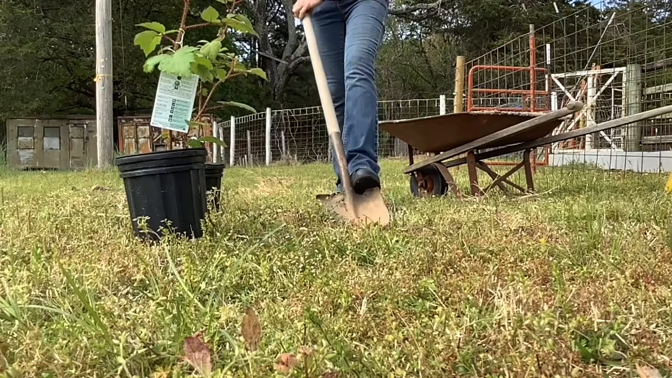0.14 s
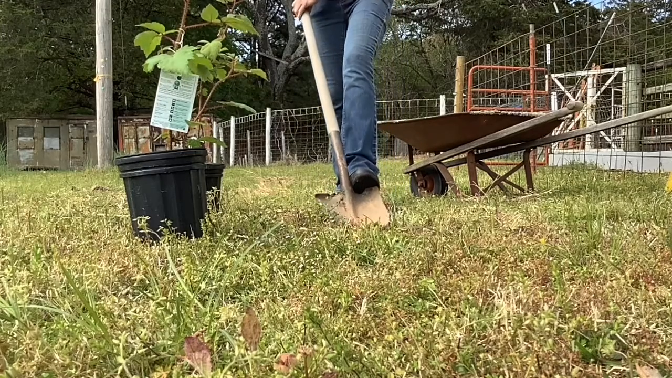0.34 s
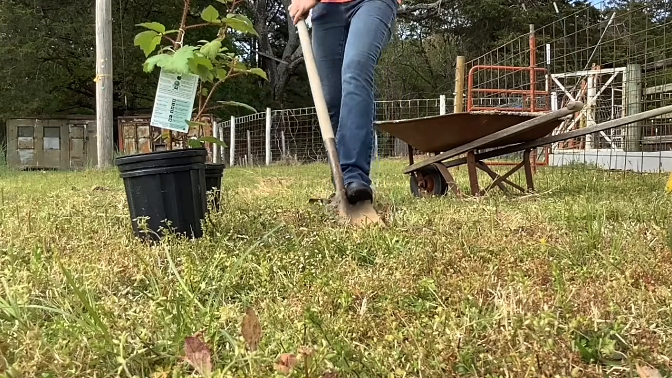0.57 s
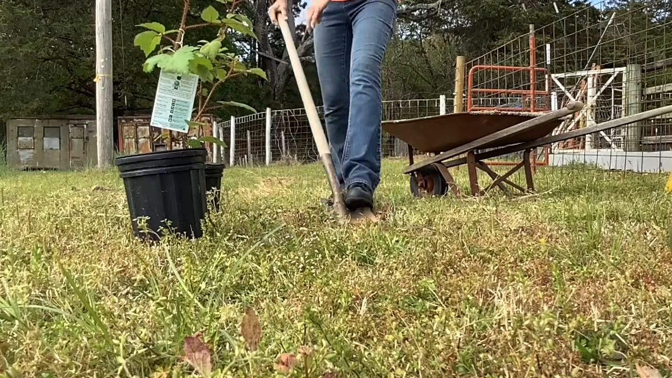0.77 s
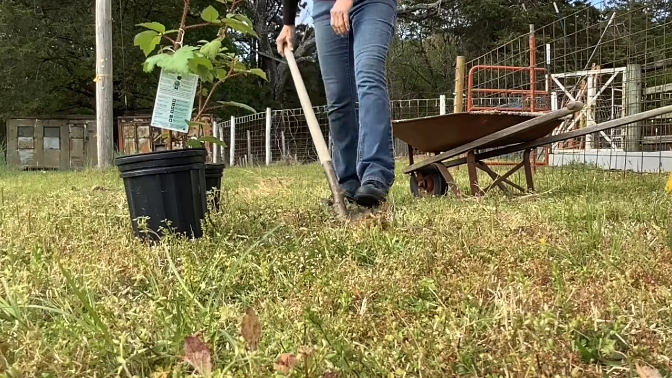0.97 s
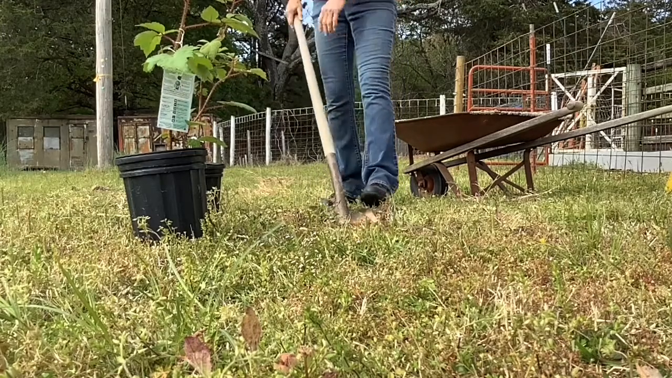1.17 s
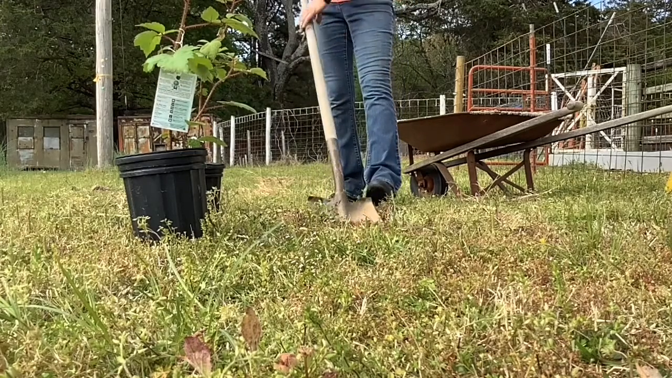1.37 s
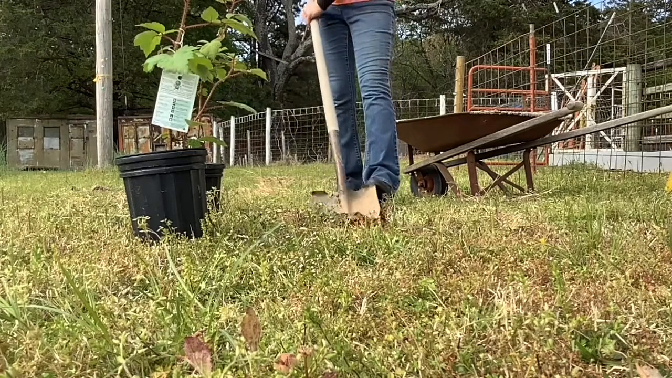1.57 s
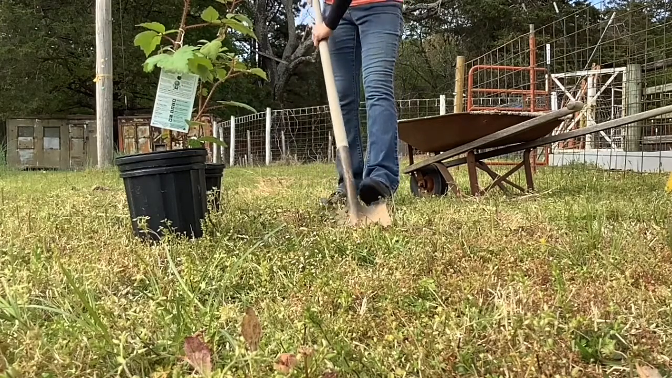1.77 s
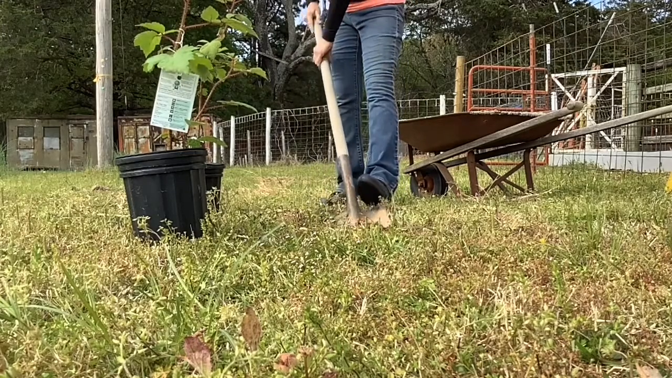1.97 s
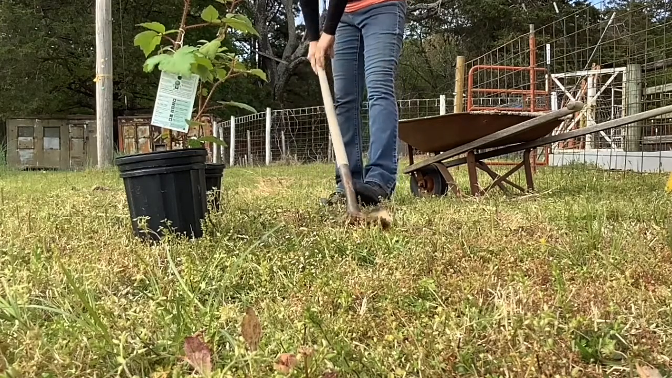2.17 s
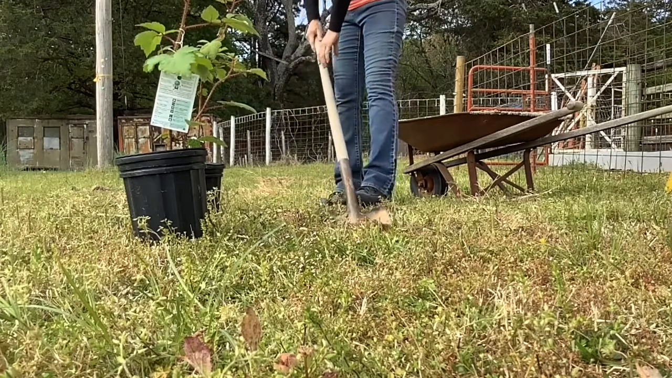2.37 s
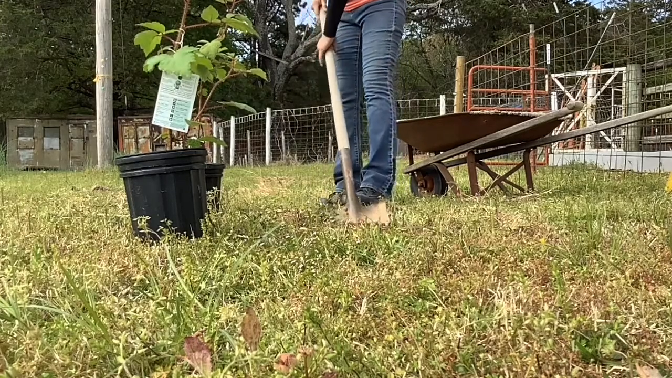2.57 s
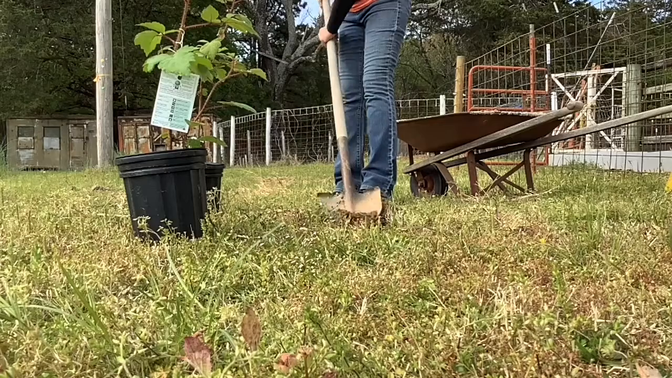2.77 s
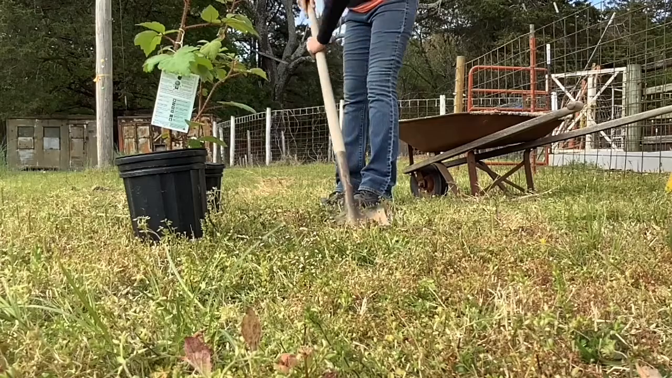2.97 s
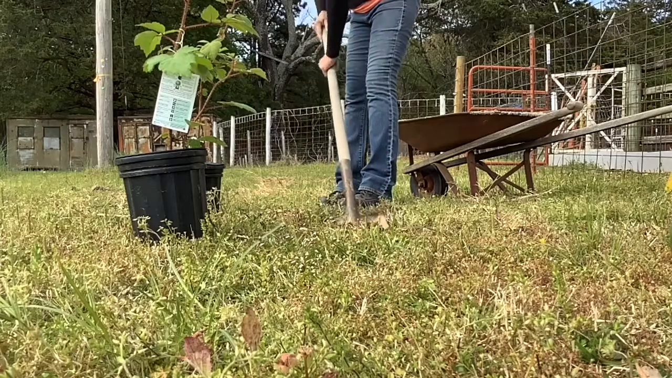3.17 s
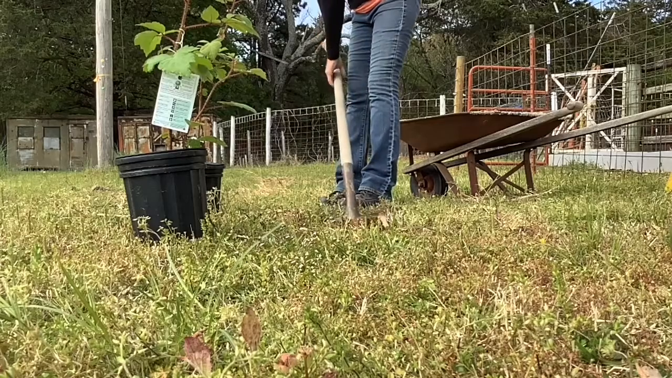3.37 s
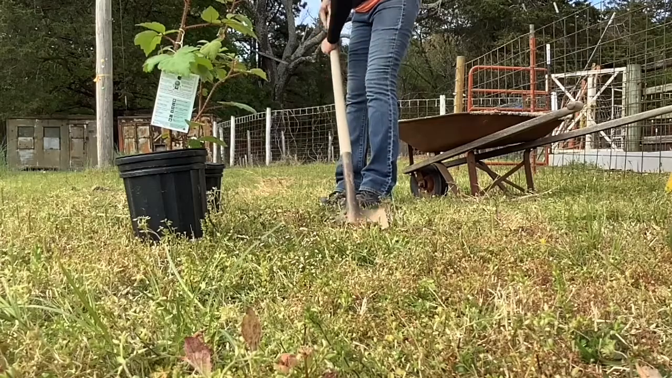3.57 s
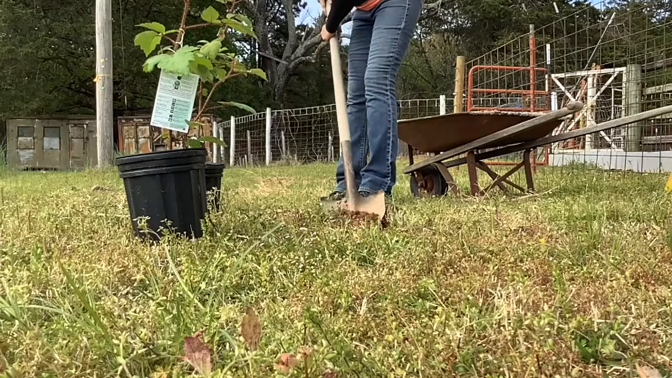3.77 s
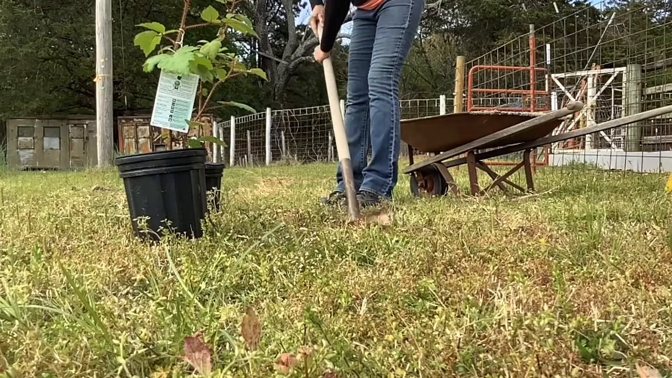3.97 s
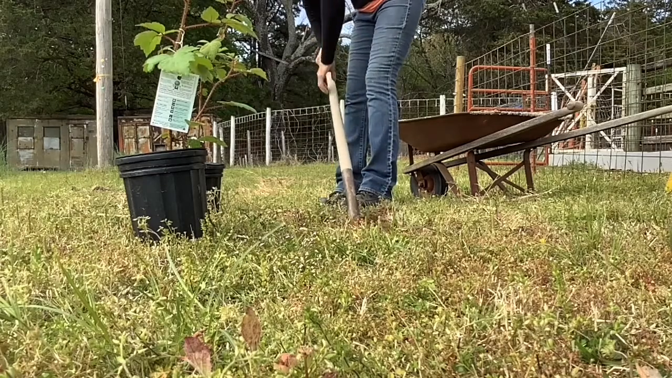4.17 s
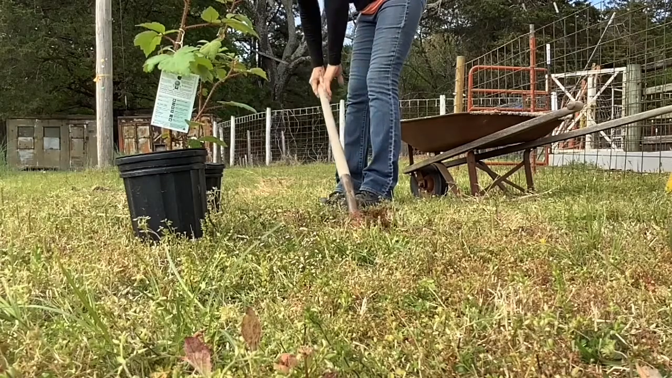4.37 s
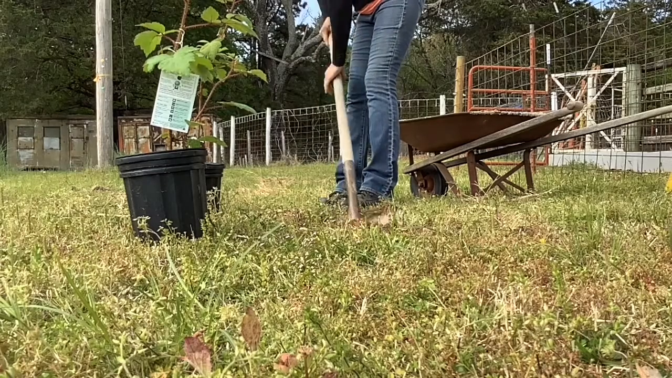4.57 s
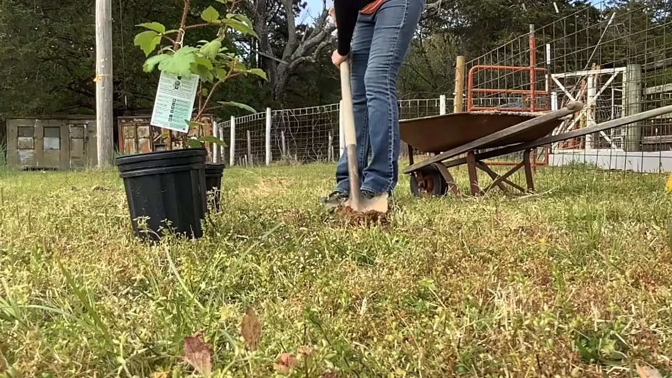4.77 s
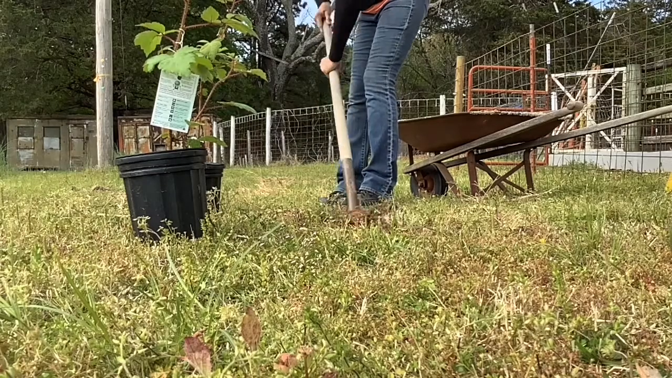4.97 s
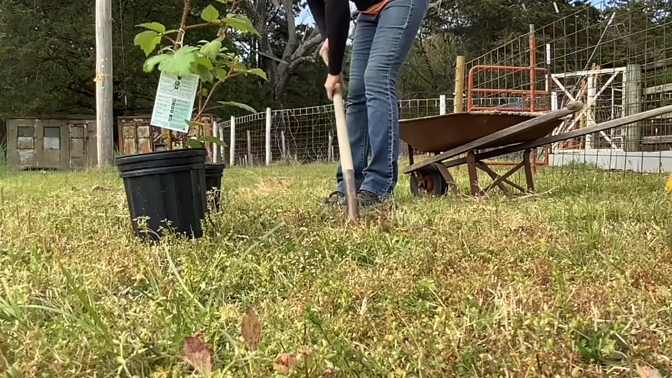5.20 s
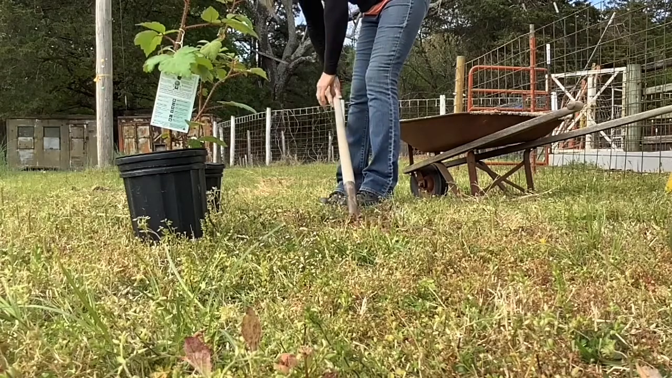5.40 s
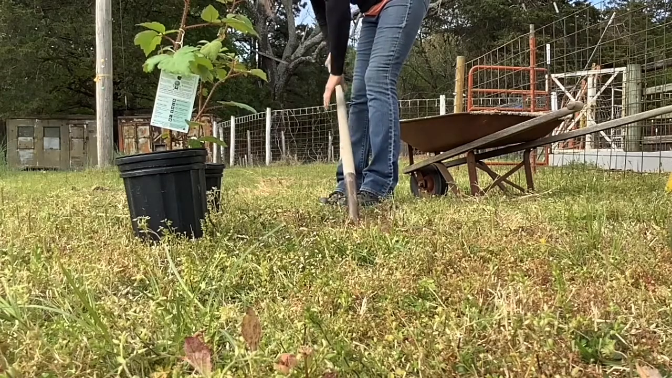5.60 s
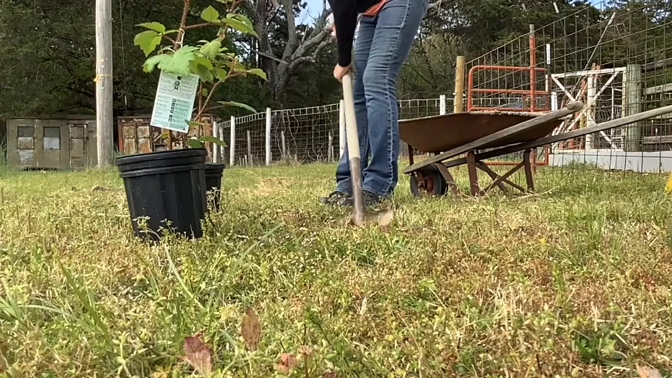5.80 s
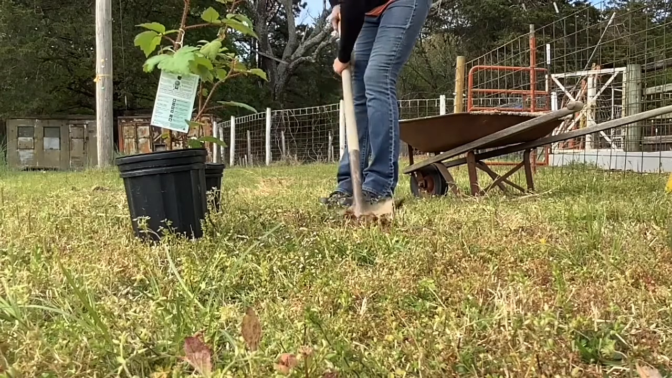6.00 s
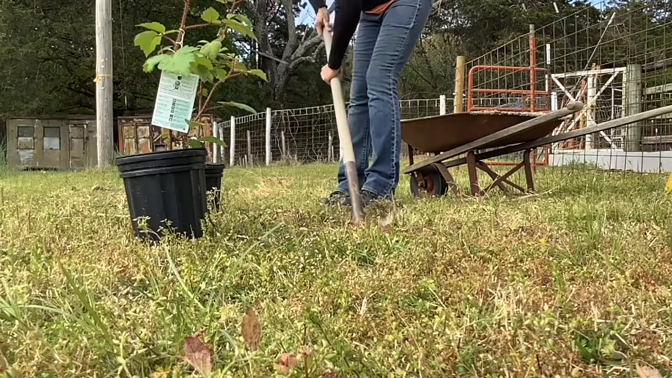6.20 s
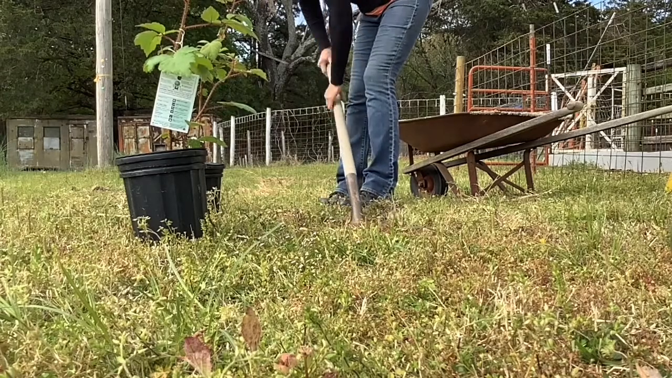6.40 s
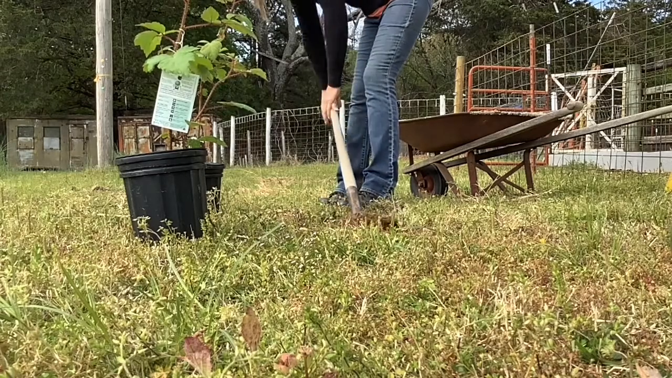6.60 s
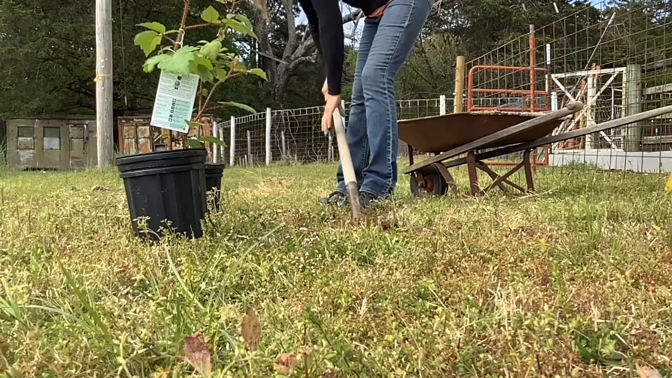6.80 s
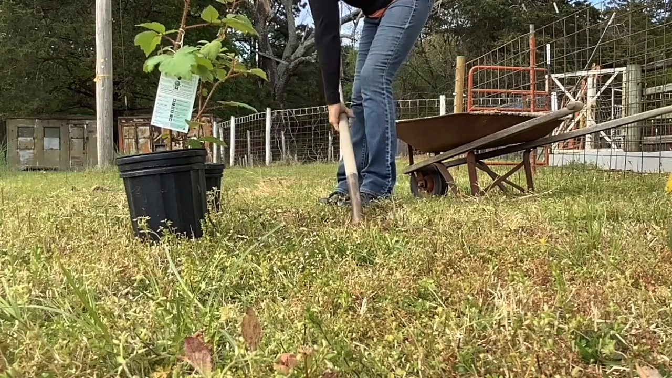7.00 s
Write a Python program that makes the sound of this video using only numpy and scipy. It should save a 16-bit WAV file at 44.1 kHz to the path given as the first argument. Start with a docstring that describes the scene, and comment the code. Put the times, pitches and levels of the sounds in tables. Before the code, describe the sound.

Short hollow chops of a shovel blade into packed soil, with dry crunches and soft levering between them, over faint distant motor drone outdoors.

```python
"""Shovel in hard clay, quiet garden

A steel shovel blade is stabbed into hard clay about once a second, then levered, near a low microphone.
Random crumb and sand clicks ring the blade modes, jolts are swelling tones, late thuds come by the ground.
Behind it: filtered-noise air, far traffic rumble and insects, wavering motor tones, one faint blurred bird."""
import sys
import numpy as np
from scipy import signal
from scipy.fft import rfft, irfft, next_fast_len
from scipy.io import wavfile

SR = 44100
rng = np.random.default_rng(int(sys.argv[2]) if len(sys.argv) > 2 else 0)


def wav_out(sig):
    """Save sig, one row per channel (or a flat mono array), as 16-bit PCM at SR to the path in sys.argv[1]."""
    wavfile.write(sys.argv[1], SR, np.round(np.clip(np.atleast_2d(sig).T, -1, 1) * 32767).astype(np.int16))


def invert_db(level):
    """Linear amplitude ratio for a level in decibels (20 dB per decade), elementwise."""
    return 10 ** (np.asarray(level, dtype=float) / 20)


N = 310905   # samples, 7.05 s

# middle modes of the blade: pitch_hz, width_hz, level_db
RING_MODES = [(952, 170, -0.5), (1097, 230, 1.5), (1298, 200, 3), (1594, 95, 1.5), (1792, 81, 2.5),
              (2214, 53, -12.5), (2547, 170, -13.5)]
# modes near the cutting edge: pitch_hz, width_hz, level_db
EDGE_MODES = [(2340, 530, -6.5), (3130, 230, -9.5), (3500, 210, -9.5), (3795, 80, -12.5), (4160, 80, -5.5),
              (4500, 200, -7), (4920, 250, -9), (5357, 240, -7.5), (6100, 1500, -10.5), (6550, 150, -12.5),
              (7200, 200, -17.5)]


def rms_one(x):
    """Scale to rms 1."""
    return x / np.sqrt(np.mean(x ** 2) + 1e-20)


def in_time(rows):
    """Columns of a table as straight lines in time, one value per sample."""
    s, *columns = np.transpose(rows)
    return [np.interp(np.arange(N) / SR, s, column) for column in columns]


def drift(rate_hz):
    """Slow random wander: normal random points of spread 1, joined by straight lines."""
    points = rng.standard_normal(int(N / SR * rate_hz) + 2)
    return np.interp(np.arange(N) / SR * rate_hz, np.arange(len(points)), points)


def coloured(x, spectrum):
    """Give a steady signal a spectrum of (pitch_hz, level_db), then rms 1."""
    size = next_fast_len(N)
    hz, db = np.transpose(spectrum)
    bin_hz = np.arange(size // 2 + 1) * SR / size
    shape_db = np.interp(np.log(bin_hz + 1), np.log(hz), db)
    return rms_one(irfft(rfft(x, size) * invert_db(shape_db), size)[:N])


def resonate(x, hz, width_hz):
    """One damped resonance, gain 1 on top."""
    r = np.exp(-np.pi * width_hz / SR)
    feedback = [1, -2 * r * np.cos(2 * np.pi * hz / SR), r * r]
    return signal.lfilter([(1 - r * r) / 2, 0, (r * r - 1) / 2], feedback, x + 1e-18)


def modes(x, table):
    """Parallel resonances with alternating signs."""
    return sum((-1) ** k * invert_db(db) * resonate(x, hz, width) for k, (hz, width, db) in enumerate(table))


def below(x, hz):
    """Steep low-pass: removes everything above hz."""
    return signal.sosfilt(signal.butter(4, hz, fs=SR, output="sos"), x)


def tone(hz, db, waver_db):
    """A far motor tone that wavers in level and pitch on its way through the air."""
    phase = 2 * np.pi * np.cumsum(hz + 0.6 * drift(12)) / SR
    return np.sqrt(2) * invert_db(db + waver_db * drift(11)) * np.sin(phase)


def air():
    """Steady air of the garden: noise with a fixed spectrum."""
    # colour of the air: pitch_hz, level_db (density per Hz)
    air_spectrum = [(21, -36), (35, -11.5), (65, 1), (92, 2), (162, -20), (284, -13.5), (510, -12),
                    (610, -28), (729, -25.5), (941, -36.5), (3280, -45.5), (4350, -37), (5200, -47),
                    (8440, -39.5), (15600, -49.5)]
    return invert_db(-65.5) * coloured(rng.standard_normal(N), air_spectrum)


def rumble():
    """Far traffic: low band noise that swells and sinks."""
    # level of the traffic: time_s, level_db
    swells = [(0.0, -63.5), (0.53, -58), (0.78, -61), (1.18, -71), (1.51, -61.5), (1.75, -50.5),
              (2.08, -68), (2.32, -62.5), (2.61, -62), (2.87, -62), (3.36, -63), (4.18, -61.5), (4.53, -62),
              (4.85, -61.5), (5.2, -63.5), (5.38, -61), (6.87, -63), (7.05, -60)]
    low = signal.butter(2, [55, 170], "band", fs=SR, output="sos")
    noise = rms_one(signal.sosfilt(low, rng.standard_normal(N)))
    return invert_db(in_time(swells)[0] + 3.1 * drift(2.6)) * noise


def motors():
    """Far motor hum with its octave, and three fainter steady-pitched tones."""
    # far hum: time_s, pitch_hz, level_db, octave_level_db
    hum = [(0, 89.76, -78.5, -81.5), (2.4, 91.08, -66.5, -79.5), (3.0, 90.5, -61.5, -76),
           (3.5, 91.4, -62, -76), (3.8, 91.97, -73, -78), (4.2, 90.26, -62, -77),
           (4.6, 90.27, -55.5, -67.5), (5.05, 90.86, -64, -70), (5.3, 90.82, -51.5, -68.5),
           (6.0, 92, -55.5, -71), (6.6, 92.6, -52, -70.5), (7.05, 93.2, -52.5, -73)]
    # fainter tones: pitch_hz of each
    drone_pitches = [144.8, 102.0, 57.7]
    # their levels: time_s, first_level_db, second_level_db, third_level_db
    drone_levels = [(0, -66.5, -80, -80), (1.0, -72.5, -78, -79), (2.25, -80.5, -80, -81),
                    (2.5, -63, -76, -85.5), (2.85, -59.5, -74, -76.5), (3.17, -78.5, -59.5, -78.5),
                    (3.9, -72, -70.5, -78.5), (4.5, -77, -69.5, -69), (5.0, -70, -70.5, -68.5),
                    (6.0, -61, -66, -75.5), (7.05, -64.5, -65.5, -59.5)]
    hz, db, octave_db = in_time(hum)
    drones = sum(tone(drone_hz, drone_db, 2.9)
                 for drone_hz, drone_db in zip(drone_pitches, in_time(drone_levels)))
    return tone(hz, db, 1.1) + tone(2 * hz, octave_db, 0.75) + drones


def insects():
    """Insect chorus: noise through the same resonance twice, its level wandering."""
    hz, width_hz, level_db = 4400, 410, -91.5
    chorus = resonate(resonate(rng.standard_normal(N), hz, width_hz), hz, width_hz)
    return invert_db(level_db + 1.5 * drift(4)) * rms_one(chorus)


def bird():
    """Leaves and distance smear the far bird's notes into a band of flutter around the pitch."""
    # notes blurred by trees: time_s, pitch_hz, level_db
    notes = [(4.27, 4000, -105), (4.3, 3900, -84), (4.35, 3700, -78.5), (4.38, 3900, -90),
             (4.45, 4050, -79), (4.47, 3900, -85), (4.52, 4000, -72), (4.56, 4100, -86),
             (4.62, 4250, -78.5), (4.72, 4300, -100)]
    hz, db = in_time(notes)
    slow = signal.butter(2, 220, fs=SR, output="sos")
    blur = rms_one(signal.sosfilt(slow, rng.standard_normal((2, N))))
    phase = 2 * np.pi * np.cumsum(hz) / SR
    return invert_db(db) * (blur[0] * np.sin(phase) + blur[1] * np.cos(phase))


def thuds():
    """The ground carries low tones slowly: the lower, the later they arrive."""
    # thuds before the ground delay: time_s, level_db
    blows = [(0.55, -45.5), (0.669, -62), (1.768, -38), (1.891, -41), (2.94, -39), (3.88, -33),
             (4.971, -40), (6.125, -38.5)]
    # tones of the ground: pitch_hz, level_db, t60_s
    ground_modes = [(62.9, -6, 0.1), (125, 2, 0.077), (220, -3, 0.082), (310, 6.5, 0.03)]
    out, t = np.zeros(N + 12000), np.arange(12000) / SR
    for s, db in blows:
        for hz, mode_db, t60 in ground_modes:
            at = round((s + 3.3 / hz) * SR)   # 3.3 cycles late
            swell = (1 - np.exp(-t * hz / 0.15)) * invert_db(-60 * t / t60)
            out[at:at + 12000] += invert_db(db + mode_db) * swell * np.sin(2 * np.pi * hz * t)
    return out[:N]


def jolts():
    """Each jolt swells over a few cycles in the blade body and dies in the clay; its front strikes upper modes."""
    # the clay stops or slips under the blade: peak_s, body_db, body_pitch_hz, length_ms, upper_ring_db
    jolt_rows = [(0.42, -45, 570, 9.2, -74), (0.443, -43, 577, 6.6, -53), (0.455, -44.5, 580, 6.9, -66),
                 (0.479, -46, 598, 4, -50), (0.501, -35, 624, 9.2, -61), (0.517, -33, 543, 2, -49),
                 (0.552, -25, 557, 4.1, -48), (0.573, -34.5, 637, 5.6, -58), (0.639, -43.5, 610, 8, -61),
                 (0.666, -39.5, 550, 6.3, -62), (0.685, -38.5, 516, 4.1, -53), (0.717, -48, 524, 6.8, -59),
                 (0.741, -44, 529, 6.7, -49.5), (1.397, -53.5, 613, 9.2, -63), (1.72, -34.5, 568, 6, -60),
                 (1.756, -18.5, 550, 12.3, -36.5), (1.762, -9.5, 539, 8.8, -23.5),
                 (1.771, -14, 471, 3.55, -41.5), (1.779, -33.5, 568, 4.2, -49),
                 (1.89, -30.5, 495, 4.2, -55), (2.121, -49.5, 483, 6.5, -63), (2.912, -36, 539, 6.8, -39.5),
                 (2.923, -30, 544, 10.8, -51.5), (2.933, -14.5, 544, 9.8, -21),
                 (2.944, -11, 502, 3.5, -33.5), (2.958, -25.5, 554, 2.4, -64), (3.033, -40, 588, 8.6, -78),
                 (3.078, -43, 510, 2.9, -60), (3.825, -40, 612, 3.77, -30), (3.855, -46, 457, 1.75, -35.5),
                 (3.864, -19, 460, 2.75, -26), (3.877, -21.5, 570, 4.1, -46.5),
                 (3.886, -19.5, 460, 3.33, -47), (3.893, -35, 450, 2.6, -56.5),
                 (3.955, -42.5, 490, 2.8, -69), (4.135, -44, 567, 8.25, -68.5), (4.149, -41.5, 496, 4, -51),
                 (4.221, -51, 504, 3.5, -66), (4.94, -33.5, 524, 5.1, -32.5), (4.95, -27, 460, 3.1, -59.5),
                 (4.961, -26.5, 377, 4.63, -36.5), (4.975, -26, 514, 2.9, -36),
                 (4.986, -25.5, 601, 8.3, -43), (5.085, -48, 499, 3.1, -70), (5.162, -48.5, 496, 4.1, -75),
                 (5.177, -43.5, 447, 3.5, -78), (5.21, -45, 459, 3.7, -59), (5.24, -47, 467, 5, -74.5),
                 (5.753, -41, 544.4, 4.2, -55), (5.773, -40, 500, 5, -55), (5.908, -51, 516, 3.8, -59),
                 (6.066, -37.5, 474, 3.4, -47), (6.092, -36, 437, 5, -44), (6.122, -20, 499, 2.94, -53),
                 (6.138, -30, 577, 6.1, -42.5), (6.189, -47.5, 601, 10.8, -64),
                 (6.219, -48.5, 536, 7.1, -61), (6.282, -44.5, 543, 3.4, -55.5)]
    out, fronts, t = np.zeros(N + 4000), np.zeros(N), np.arange(4000) / SR
    for s, db, hz, length_ms, ring_db in jolt_rows:
        rise_s = length_ms / 1700   # the swell is 1.7 rises long at half height
        at = round((s - rise_s) * SR)
        swell = (t / rise_s * np.exp(1 - t / rise_s)) ** 2
        out[at:at + 4000] += invert_db(db) * swell * np.sin(2 * np.pi * hz * t)
        fronts[at + round(0.4 * rise_s * SR)] = invert_db(ring_db)
    ring = below(modes(fronts, RING_MODES) + invert_db(-12.5) * resonate(fronts, 1600, 1300), 2300)
    edge = invert_db(-14.5) * below(modes(fronts, EDGE_MODES), 3800)
    click = 1.0 * (t == 0)
    ring_peak = np.abs(modes(click, RING_MODES)).max()
    return out[:N] + (ring + edge) / ring_peak


def strength(start, hold, db, rise_db_per_s, fall_db_per_s):
    """Summed power of events that rise up to start, hold and fall in straight dB ramps, per millisecond."""
    t = np.arange(0, N / SR + 0.002, 0.001)[:, None]
    ramp = rise_db_per_s * np.maximum(start - t, 0) + fall_db_per_s * np.maximum(t - start - hold, 0)
    return np.sum(invert_db(db - np.minimum(ramp, 150)) ** 2, axis=1)


def slides():
    """Blade slides through turf and clay: powers of body, ring, edge and hiss."""
    # slides: start_s, length_s, body_db, ring_db, grit_db
    slide_rows = [(0.0, 0.062, -66.5, -74, -79), (0.413, 0.018, -56, -65, -79),
                  (0.444, 0.077, -54, -57.5, -73.5), (.497, 0.061, -41.5, -49, -66),
                  (0.541, 0.02, -40.5, -47, -60), (0.603, 0.04, -65, -54.5, -80),
                  (0.674, 0.051, -54.5, -58.5, -92.5), (1.392, 0.028, -69, -68.5, -80.5),
                  (1.421, .015, -55.5, -67, -68), (1.45, 0.017, -66.5, -63, -65.5),
                  (1.701, .03, -56, -58.5, -57.5), (1.735, .018, -62, -60.5, -59.5),
                  (1.886, 0.014, -47.5, -58, -73), (2.909, 0.021, -53, -43, -51),
                  (2.939, 0.011, -37, -43.5, -56.5), (3.238, 0.034, -60.5, -65.5, -79.5),
                  (3.823, 0.0056, -47, -40.5, -56.5), (3.841, 0.02, -46, -57, -56.5),
                  (4.112, .05, -60, -75.5, -78.5), (4.583, 0.013, -54.5, -60.5, -79),
                  (4.936, 0.0055, -50, -41.5, -45.5), (4.953, 0.017, -52, -44, -50.5),
                  (5.2, 0.02, -75, -71, -85), (5.708, 0.037, -61, -71, -67.5),
                  (5.761, 0.032, -50, -59.5, -64.5), (5.904, .008, -60, -71.5, -77),
                  (6.056, 0.026, -52.5, -52.5, -56), (6.08, 0.037, -44, -50, -58.5)]
    s, length, body_db, ring_db, grit_db = np.transpose(slide_rows)
    hiss_db = grit_db - 9.5
    return [strength(s, length, db, 5000.5, 901) for db in (body_db, ring_db, grit_db, hiss_db)]


def stops():
    """Clay stops the blade: the highs fade from the first touch, the body holds."""
    # stops: start_s, hold_s, body_db, ring_db, grit_db
    stop_rows = [(1.761, .014, -29, -27, -40.5), (2.931, 0.017, -24, -31, -44.5),
                 (3.867, 0.021, -31.5, -29, -46.5), (4.964, 0.019, -34, -40.5, -46.5),
                 (6.123, 0.0034, -27, -43, -50.5)]
    s, hold, body_db, ring_db, grit_db = np.transpose(stop_rows)
    body = strength(s, hold, body_db, 901, 1899.5)
    ring = strength(s, 0, ring_db, 2000, 1200)
    grit = strength(s, 0, grit_db, 2000, 1300)
    return [body, ring, grit, grit * invert_db(-6.5) ** 2]


def pries():
    """Blade is levered, shifted or settles in the soil: powers of body, ring and edge."""
    # pries: start_s, length_s, body_db, ring_db
    pry_rows = [(0, 0.12, -69, -78.5), (0.578, 0.13, -56, -65), (0.758, 0.059, -74, -75.5),
                (0.91, 0.087, -73.5, -84), (1.065, 0.017, -67, -77.5), (1.34, .05, -74, -77.5),
                (1.48, 0.023, -69, -73.5), (1.79, 0.075, -63, -74.5), (1.904, 0.055, -64.5, -74.5),
                (2.12, 0.075, -66, -82.5), (2.237, 0.05, -63, -90), (2.524, 0.077, -65, -80),
                (2.866, .04, -76, -74), (2.97, 0.093, -58.5, -72.5), (3.198, 0.095, -64.5, -77),
                (3.521, 0.074, -64.5, -75.5), (3.79, .04, -68, -73.5), (3.897, 0.18, -62, -74.5),
                (4.217, .01, -66, -80.5), (4.485, 0.14, -63.5, -73.5), (4.9, 0.061, -68.5, -68),
                (4.988, 0.027, -61, -68.5), (5.119, .14, -64, -80), (5.296, 0.083, -70, -79.5),
                (5.66, 0.034, -69.5, -86), (5.816, 0.16, -65, -77.5), (6.142, 0.045, -57.5, -71),
                (6.305, .12, -64.5, -80)]
    s, length, body_db, ring_db = np.transpose(pry_rows)
    grit_db = ring_db - 11.5
    return [strength(s, length, db, 250, 181.5) for db in (body_db, ring_db, grit_db)]


def rustles():
    """Dry grass is crushed and brushed: power of the hiss."""
    # rustles: start_s, length_s, level_db
    rustle_rows = [(0.0, 0.089, -81), (0.417, .008, -73.5), (0.464, .03, -67.5), (.52, 0.032, -56.5),
                   (0.612, .02, -67.5), (0.684, 0.023, -70.5), (1.423, 0.044, -68), (1.707, 0.051, -61),
                   (2.912, 0.023, -55.5), (3.469, .02, -84), (3.854, 0.015, -55), (4.1, .05, -82),
                   (4.584, .02, -81.5), (4.952, 0.0078, -53), (5.201, 0.023, -82.5), (5.742, 0.046, -68),
                   (6.066, 0.045, -55.5)]
    return strength(*np.transpose(rustle_rows), 798, 600)


def blade_motion():
    """Gains of body, ring, edge and hiss: slides, stops, pries and rustles add up in power."""
    # blade held still, one level_db each for body, ring, edge, hiss
    resting = [-81, -95, -91.5, -92]
    ms = np.arange(N) / SR * 1000
    gains = []
    for slide, stop, gentle, rest_db in zip(slides(), stops(), pries() + [rustles()], resting):
        power = slide + stop + gentle
        gains.append(np.sqrt(np.interp(ms, np.arange(len(power)), power) + invert_db(rest_db) ** 2))
    return gains


def grains(per_s, mean_db):
    """Random clicks of uneven size and sign: crumbs of clay breaking."""
    sizes = invert_db(mean_db * np.minimum(rng.exponential(1, N), 4)) * rng.choice([-1, 1], N)
    return sizes * (rng.random(N) < per_s / SR)


def shifting_modes(x, table, shift_db, top_hz):
    """The clay grips the blade at ever other spots, so each mode swells and fades by itself."""
    rings = [(-1) ** k * modes(x * invert_db(shift_db * drift(35)), [mode]) for k, mode in enumerate(table)]
    return rms_one(below(sum(rings), top_hz))


def scraping():
    """Crumbs hit the moving blade and keep its modes ringing; grass and dust hiss on top."""
    # blade body held by the clay: pitch_hz, width_hz, level_db
    body_modes = [(352, 93, -4), (442, 120, -5), (513.6, 81, -2), (623.7, 50, -4.5)]
    # colour of the hiss: pitch_hz, level_db (density per Hz)
    grit_spectrum = [(1500, -30), (3000, -13), (5000, -10), (7500, -11.5), (9000, -3.5), (11900, -3.5),
                     (13100, -1.5), (15600, -6)]
    body_gain, ring_gain, edge_gain, hiss_gain = blade_motion()
    crumbs, sand = grains(1500, 3.5), grains(3000, 3.6)
    body = rms_one(below(resonate(modes(crumbs, body_modes), 530, 700), 820))
    ring = shifting_modes(crumbs + 0.86 * sand, RING_MODES, 3.4, top_hz=2800)
    edge = shifting_modes(sand, EDGE_MODES, 3.5, top_hz=7000)
    dust = grains(5400, 3.9) + 0.68 * sand
    hiss = coloured(dust * invert_db(2.0 * drift(90)), grit_spectrum)
    return body_gain * body + ring_gain * ring + edge_gain * edge + hiss_gain * hiss


def scene():
    """Shovel in front of the garden; its echo off the ground cancels one band at the low microphone."""
    shovel = scraping() + jolts() + thuds()
    shovel = shovel - resonate(shovel, hz=740, width_hz=110)
    garden = air() + rumble() + motors() + insects()
    return (shovel + garden + bird())[None]


def low_pass(x):
    """Removes everything above the highest recorded frequency."""
    return signal.sosfilt(signal.butter(12, 15720, fs=SR, output="sos"), x)


def record(dry):
    """The microphone cuts the deepest bass steeply, below 47 Hz."""
    bass_cut = signal.butter(8, 47, "high", fs=SR, output="sos")
    mix = signal.sosfilt(bass_cut, dry)
    return low_pass(mix)


dry = scene()
out = record(dry)
wav_out(out)
```